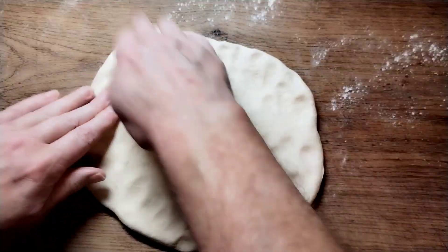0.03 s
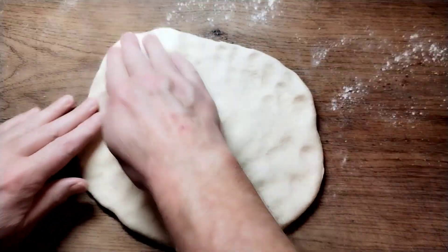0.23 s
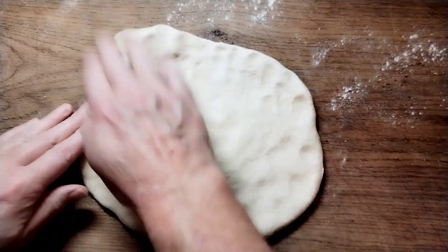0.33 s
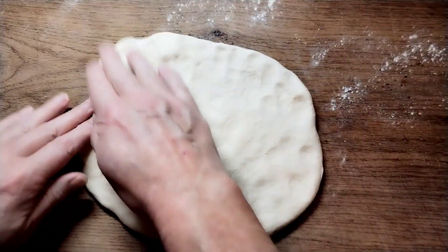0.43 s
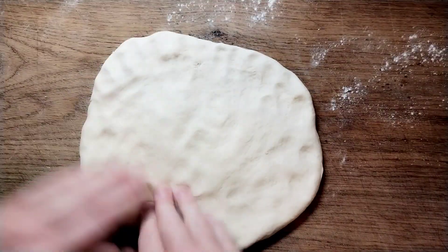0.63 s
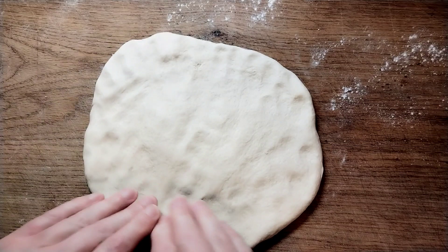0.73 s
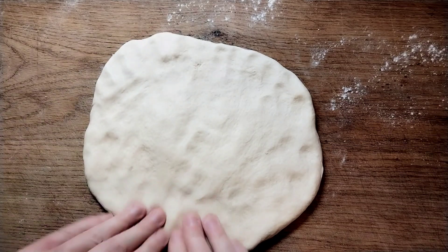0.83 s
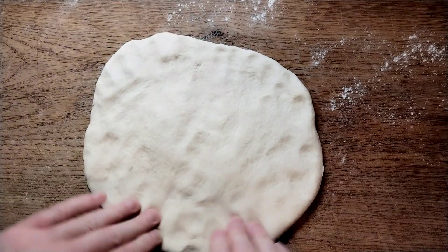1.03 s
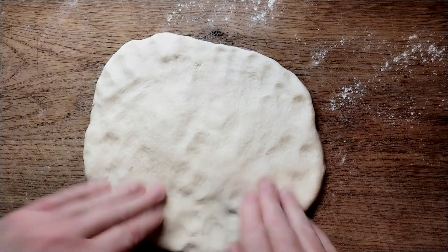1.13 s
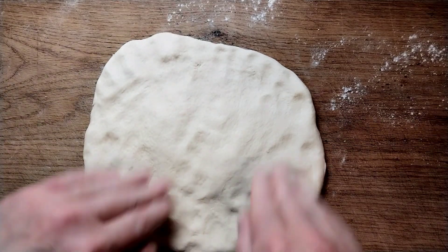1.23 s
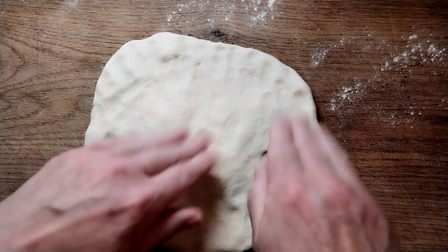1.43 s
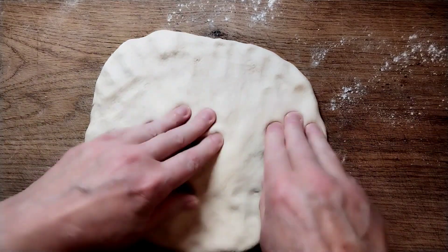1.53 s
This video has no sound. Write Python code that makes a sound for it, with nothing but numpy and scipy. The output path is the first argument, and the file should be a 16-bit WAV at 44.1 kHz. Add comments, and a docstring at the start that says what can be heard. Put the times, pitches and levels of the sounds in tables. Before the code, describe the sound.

Hands patting dough on a wooden table, soft taps with one louder palm slap.

```python
"""Patting out dough

Two hands pat a round of dough on a floured wooden table, close up in a small kitchen. Each pat is
a shower of tiny skin contacts with a crackle of flour; trapped air adds a hollow knock, and a low
thump rises in pitch as the dough is squeezed. One full-palm slap sets table and room ringing, a
small bubble bursts, and the room answers every blow."""
import sys
import numpy as np
from scipy import signal
from scipy.fft import rfft, irfft
from scipy.io import wavfile

SR = 44100
rng = np.random.default_rng(int(sys.argv[2]) if len(sys.argv) > 2 else 0)


def generate_wav(signal):
    """Clip the signal to [-1, 1] and save it as 16-bit WAV at the path in sys.argv[1]."""
    frames = np.transpose(np.atleast_2d(signal))
    scaled = np.clip(frames, -1, 1) * 32767
    pcm = np.round(scaled).astype(np.int16)
    wavfile.write(sys.argv[1], SR, pcm)


N = 70560
T = np.arange(N) / SR


# Edges of a contact's four registers (body, knock, smack, flour crackle): edge_hz
REGISTER_EDGES = [170, 520, 1050, 3300, 14000]
# How long each register hangs on: fade_ratio
REGISTER_LINGER = [1, 1.32, 1.21, 0.89]
# Scatter of each register's clicks between left and right: spread_s
REGISTER_SPREAD = [0.00029, 0.0003, 0.00013, 0.000034]

def contact(fade_s, levels_db, clicks_per_s=4500, size_spread_db=2, attack_s=.00028, left_lag_s=.00006):
    """Skin meets floury dough in a dying shower of tiny clicks from all over the hand."""
    t, out = T[:SR // 8], 0
    registers = zip(REGISTER_EDGES, REGISTER_EDGES[1:], REGISTER_LINGER, REGISTER_SPREAD, levels_db)
    for low, high, linger, spread_s, db in registers:
        sizes = from_db(size_spread_db * np.minimum(rng.exponential(1, len(t)), 3))
        sizes *= rng.choice([-1, 1], len(t))
        hits = rng.random(len(t)) < clicks_per_s / SR
        attack = 1 - np.exp(-t / attack_s)
        release = np.exp(-(t / (fade_s * linger)) ** 1.39)  # holds a little, then drops away
        right = sizes * hits * attack * release
        arrival = np.rint((t + left_lag_s + spread_s * rng.standard_normal(len(t))) * SR).astype(int)
        left = np.bincount(np.clip(arrival, 0, len(t) - 1), right, len(t))
        out += np.array([at_level(band(clicks + 1e-18, low, high), db) for clicks in (left, right)])
    return out


# Fingers landing: start_s, fade_s, body_db, knock_db, smack_db, crackle_db
FINGER_PATS = [(.007, 0.015, -51.5, -51, -46, -50), (0.181, 0.0091, -63, -60, -72.5, -69.5),
               (0.2119, 0.0073, -48.5, -53.5, -38.5, -44), (0.228, 0.022, -47.5, -52.5, -51, -51.5),
               (0.4029, 0.004, -41, -34.5, -39.5, -39.5), (.421, 0.067, -45.5, -42.5, -46, -48),
               (0.5611, 0.0068, -68.5, -61.5, -61, -72), (0.618, 0.014, -55, -50.5, -59, -69.5),
               (0.6918, 0.0076, -51, -63, -56, -59), (.696, 0.01, -53, -47, -58.5, -52),
               (0.722, 0.035, -60, -66, -60.5, -59.5), (.856, 0.014, -51.5, -54, -57.5, -55),
               (0.8645, 0.0028, -62, -58.5, -54, -50), (1.029, 0.012, -51, -45, -50, -44),
               (1.1999, 0.014, -50, -58, -51.5, -50), (1.2069, 0.0056, -56.5, -49.5, -59, -49),
               (1.3818, 0.0075, -54.5, -61, -59.5, -56), (1.4074, 0.012, -53.5, -52, -55, -51),
               (1.561, 0.014, -52.5, -51.5, -65, -53.5), (1.574, 0.0052, -66, -51, -53.5, -46)]
# Fingertips shifting: start_s, base_level_db
FINGER_SHIFTS = [(1.288, -69), (1.473, -73), (1.486, -68)]
# Tone of a shift, added to its base level: body_db, knock_db, smack_db, crackle_db
SHIFT_TONE = [3, 1, -7.5, 2]

def fingers(shift_fade_s=.0082):
    """Fingers pat the dough and brush it lightly between pats."""
    out = np.zeros((2, N))
    for start_s, fade_s, *levels_db in FINGER_PATS:
        add(out, start_s, contact(fade_s, levels_db))
    for start_s, db in FINGER_SHIFTS:
        add(out, start_s, contact(shift_fade_s, db + np.array(SHIFT_TONE)))
    return out


# Air under the whole palm, ahead of the band-pass: pitch_hz, level_db, t60_s
PALM_MODES = [(400, -31.5, .028), (660, -31, .014), (860, -34, .014), (1320, -36.5, .016), (2500, -39, .02)]

def palm_slap(start_s):
    """The flat palm squeezes out the air in one sharp clap."""
    out = np.zeros(N)
    clap = -sum(ring(*mode) for mode in PALM_MODES)
    add(out, start_s, band(clap, low_hz=520, high_hz=3540))
    return out


# Air trapped under the hand: start_s, pitch_hz, level_db, t60_s
AIR_POCKETS = [(.011, 203, -51.5, 0.075), (.011, 337, -55.5, 0.13), (.215, 363, -43.5, 0.026),
               (0.229, 328, -46, 0.065), (.214, 1050, -51, .05), (0.4154, 336, -35, 0.074),
               (.695, 670, -48.5, 0.021), (.860, 684.5, -51.5, 0.072), (1.034, 352, -49, 0.07),
               (1.032, 1414, -55, 0.048), (1.205, 589, -47.5, 0.035), (1.203, 954, -53.5, 0.064),
               (1.383, 684, -54.5, 0.053), (1.409, 352.4, -48.5, 0.073), (1.41, 699, -50.5, 0.077),
               (1.413, 185, -52, 0.048), (1.562, 620, -55.5, 0.014), (1.573, 403, -50, 0.078),
               (1.575, 1756, -53.5, 0.03)]

def air_pockets():
    """Each pocket of air rings with a short, hollow knock."""
    out = np.zeros(N)
    for start_s, hz, db, t60 in AIR_POCKETS:
        add(out, start_s, band(ring(hz, db, t60), hz / 2, hz * 2))
    return out


# The hand's weight sinking in: start_s, level_db, pitch_at_peak_hz, time_to_peak_s
DOUGH_THUMPS = [(.006, -59.5, 78, 0.024), (0.212, -41, 98.5, 0.031), (0.406, -37, 101.4, 0.036),
                (0.694, -58, 67.4, 0.021), (0.854, -56, 68, 0.021), (1.026, -55.5, 70.2, 0.029),
                (1.198, -55, 56.3, 0.022), (1.232, -54.5, 108.7, 0.013), (1.381, -60.5, 93.7, 0.032),
                (1.563, -55.5, 77, 0.03)]

def dough_thumps(rise_hz_per_s=670, width_ratio=.53, ragged_db=-12, ragged_hz=(44.7, 180)):
    """The dough stiffens under the hand, so the thump swells and rises in pitch; it gives way unevenly."""
    out, t = np.zeros(N), T[:SR // 5]
    for start_s, db, hz, peak_s in DOUGH_THUMPS:
        swell = np.exp(-.5 * ((t - peak_s) / (width_ratio * peak_s)) ** 2)
        cycles = np.cumsum(hz + rise_hz_per_s * (t - peak_s)) / SR
        thump = swell * np.sin(2 * np.pi * cycles)
        ragged = band(rng.standard_normal(len(t)) * t * np.exp(-(t / peak_s) ** 2), *ragged_hz)
        add(out, start_s, at_level(thump, db) + at_level(ragged, db + ragged_db))
    return out


# Resonances of table and room, before each blow's gain: pitch_hz, level_db, t60_s
LOW_MODES = [(102, -54.5, 0.14), (209.2, -50, 0.39), (283, -48, 0.12), (422, -31, 0.16), (506, -43.5, 0.13),
             (705, -40.5, 0.17), (994, -46.5, 0.33)]
# Blows that set them ringing: start_s, gain_db
RINGING_BLOWS = [(.212, -18), (0.4022, -0.5), (1.03, -27), (1.41, -29)]

def table_and_room_ring(build_s=.089):
    """Low resonances of table and room swell just after a blow, then die away."""
    out = np.zeros(N)
    swell = 1 - np.exp(-T[:SR // 2] / build_s)
    modes = sum((-1) ** k * at_level(swell * ring(hz, db, t60), db)
                for k, (hz, db, t60) in enumerate(LOW_MODES))
    for start_s, gain_db in RINGING_BLOWS:
        add(out, start_s, from_db(gain_db) * modes)
    return out


def table_shudder(start_s, range_hz=(490, 1100), level_db=-30, build_s=.011, t60_s=.18):
    """The table's crowded upper modes blur into noise, partly out of phase between left and right."""
    out, t = np.zeros((2, N)), T[:SR // 3]
    envelope = (1 - np.exp(-t / build_s)) * from_db(-60 * t / t60_s)
    left, right, opposed = rng.standard_normal((3, len(t)))
    for channel, noise in zip(out, (left + opposed, right - opposed)):
        add(channel, start_s, at_level(band(noise * envelope, *range_hz), level_db))
    return out


def bubble(start_s):
    """A small bubble in the dough bursts with a faint, high tick."""
    out = np.zeros(N)
    add(out, start_s, ring(hz=2300, db=-60, t60_s=.018))
    return out


# The kitchen's reverb: frequency_hz, tail_t60_s, tail_db, early_reflections_db
KITCHEN_REVERB = [(90, 0.38, -13.5, -18), (177, 0.33, -20.5, -8), (295, 0.72, -11, -21.5),
                  (670, 0.24, -18, -11), (1393, 0.23, -12.5, -10), (2900, 0.26, -11, -3.5),
                  (7080, 0.32, -14, -1.5), (12800, 0.43, -12.5, -9.5)]

def kitchen(send, predelay_s=.003, build_s=.015, early_t60_s=.055, centred_below_hz=441):
    """Near reflections and a late tail die band by band, centred in the bass and wide above."""
    t, response = T[:SR // 2], 0
    edges_hz = np.geomspace(50, 16000, 13)
    age = np.maximum(t - predelay_s, 0)
    for low, high in zip(edges_hz, edges_hz[1:]):
        hz = np.sqrt(low * high)
        t60, tail_db, early_db = at_hz(KITCHEN_REVERB, hz)
        tail = (1 - np.exp(-age / build_s)) * from_db(-60 * age / t60)
        early = (age > 0) * from_db(-60 * age / early_t60_s)
        envelope = np.hypot(from_db(tail_db) * tail / np.linalg.norm(tail),
                            from_db(early_db) * early / np.linalg.norm(early))
        alike = 1 / (1 + (hz / centred_below_hz) ** 2)
        mid, side = rng.standard_normal((2, len(t)))
        stereo = np.sqrt((1 + alike) / 2) * mid + np.sqrt((1 - alike) / 2) * side * [[1], [-1]]
        response += band(envelope * stereo, low, high)
    return signal.fftconvolve(send[None], response, axes=1)[:, :N]


# Colour of the room tone: frequency_hz, relative_db
ROOM_TONE = [(50, -15), (110, 8), (300, -15), (1000, -15), (3000, -14), (8000, -21), (15000, -13.5)]

def room_tone(level_db=-71):
    """Faint, steady air of the room, half shared between the two sides."""
    white = rng.standard_normal((3, N))
    colour = from_db(at_hz(ROOM_TONE, np.fft.rfftfreq(N, 1 / SR))[0])
    noise = irfft(rfft(white[:2] + white[2]) * colour, N)
    return from_db(level_db) * noise / noise.std()


def from_db(db):
    """Decibels to gain."""
    return 10 ** (np.asarray(db) / 20)


def at_level(x, db):
    """Scale a short sound so that its energy equals that level held for 20 ms."""
    return from_db(db) * x / np.sqrt(np.sum(x ** 2) / (SR / 50) + 1e-20)


def add(out, start_s, x):
    """Mix a short sound in at its start time."""
    i = int(np.clip(start_s * SR, 0, N - 1))
    out[..., i:i + x.shape[-1]] += x[..., :N - i]


def band(x, low_hz, high_hz):
    """Gentle band-pass."""
    sos = signal.butter(2, [low_hz, min(high_hz, SR * .45)], "band", fs=SR, output="sos")
    return signal.sosfilt(sos, x)


def at_hz(rows, hz):
    """Read a table's columns at a pitch, along a log-frequency axis."""
    knots, *columns = np.transpose(rows)
    return [np.interp(np.log(hz + 1), np.log(knots), column) for column in columns]


def ring(hz, db, t60_s):
    """One struck mode: a dying sine."""
    t = T[:SR // 2]
    return at_level(np.sin(2 * np.pi * hz * t) * from_db(-60 * t / t60_s), db)


def bell_eq(x, rows):
    """A chain of bell boosts and cuts."""
    for hz, db, width_hz in rows:
        angle, gain = 2 * np.pi * hz / SR, from_db(db / 2)
        width = np.sin(angle) * width_hz / (2 * hz)
        feedforward = [1 + width * gain, -2 * np.cos(angle), 1 - width * gain]
        feedback = [1 + width / gain, -2 * np.cos(angle), 1 - width / gain]
        x = signal.lfilter(feedforward, feedback, x)
    return x


def scene(slap_s=.4028, air_send_db=-5, ringing_send_db=-10):
    """Hands, dough and table straight ahead, with the room around them."""
    close = fingers() + palm_slap(slap_s) + bubble(start_s=.9075)
    air, weight, ringing = air_pockets(), dough_thumps(), table_and_room_ring()
    send = close[1] + weight + from_db(air_send_db) * air + from_db(ringing_send_db) * ringing
    return close + air + weight + ringing + table_shudder(slap_s) + kitchen(send) + room_tone()


# Resonances of each microphone port: centre_hz, gain_db, width_hz
LEFT_PORT_EQ = [(5777, 14, 1720), (3480, -6, 2230), (12180, -17, 17800)]
RIGHT_PORT_EQ = [(8110, 15.5, 2650), (3670, -9.5, 4760), (12700, -15.5, 14900), (2607, 3, 1800)]

def record(dry):
    """Each port colours its own channel, and a steep low-pass cuts the very top."""
    coloured = np.array([bell_eq(dry[0], LEFT_PORT_EQ), bell_eq(dry[1], RIGHT_PORT_EQ)])
    top_cut = signal.cheby2(12, 60, 15350, fs=SR, output="sos")  # 60 dB down from 15350 Hz
    return signal.sosfilt(top_cut, coloured)


dry = scene()
out = record(dry)
generate_wav(out)
```